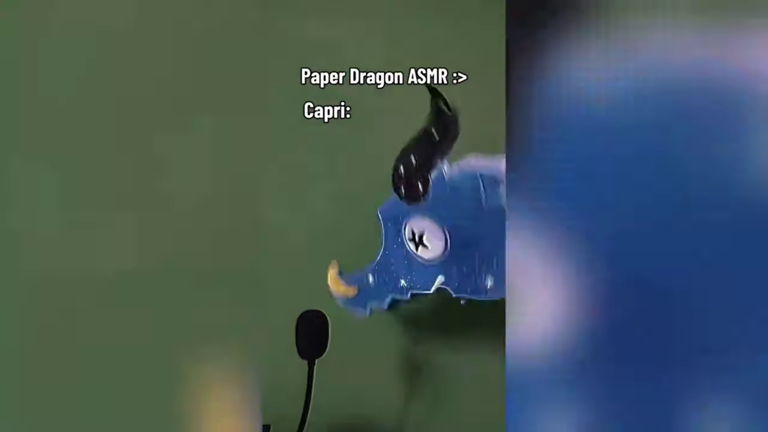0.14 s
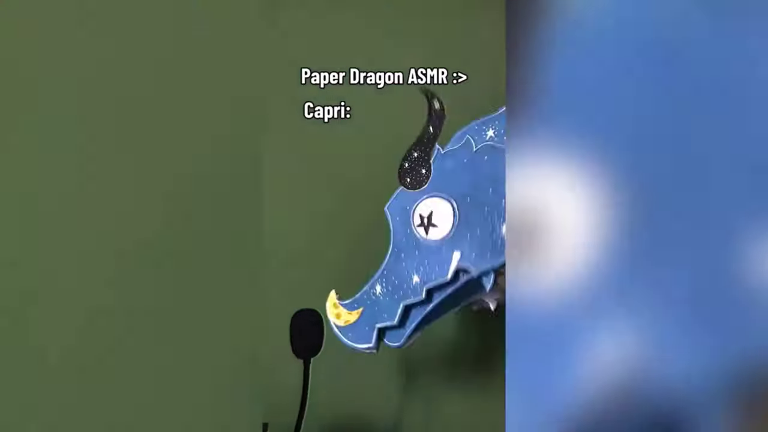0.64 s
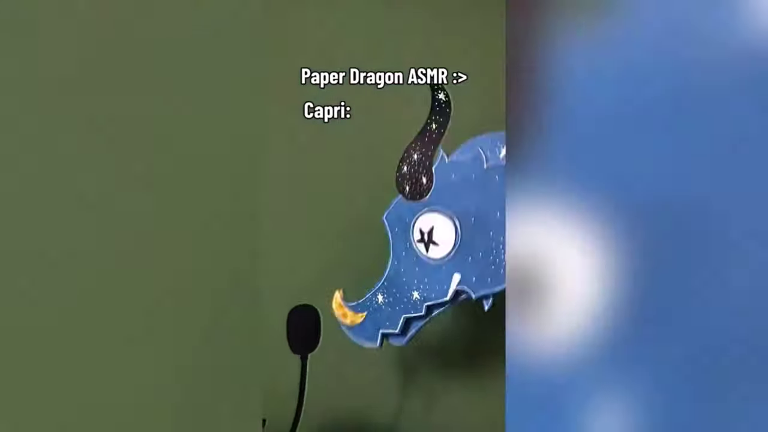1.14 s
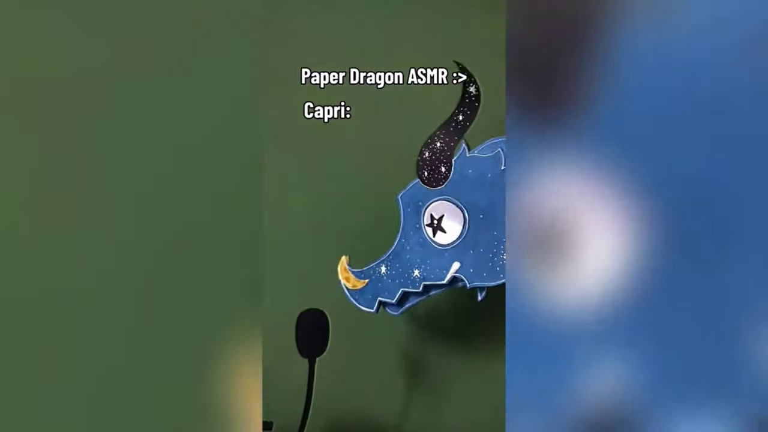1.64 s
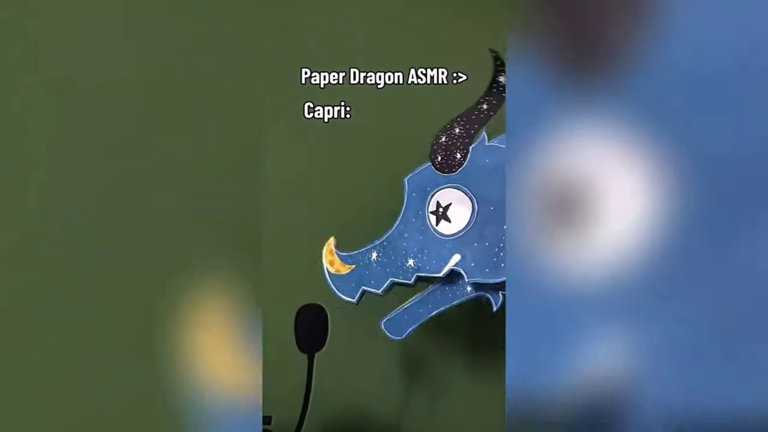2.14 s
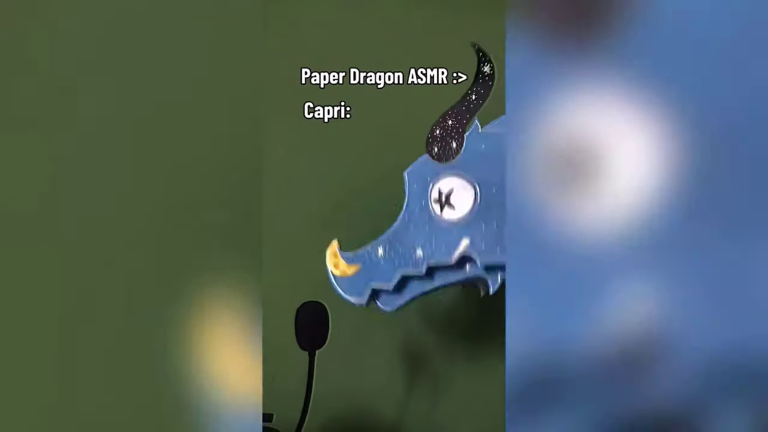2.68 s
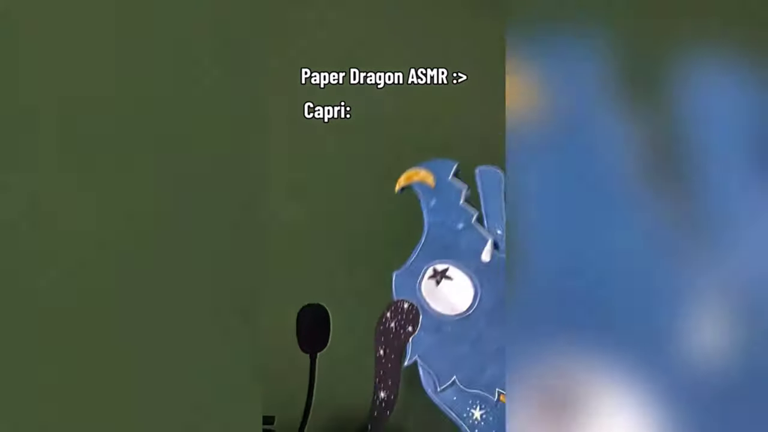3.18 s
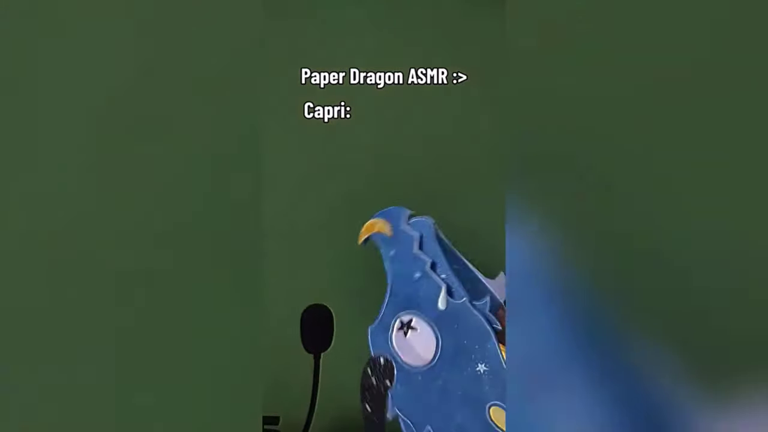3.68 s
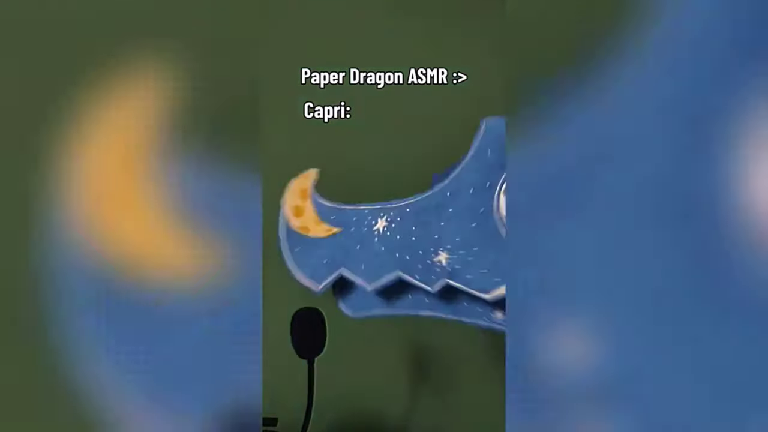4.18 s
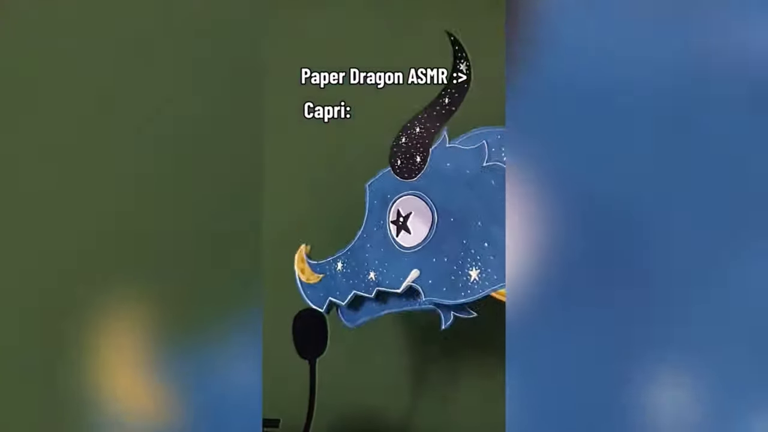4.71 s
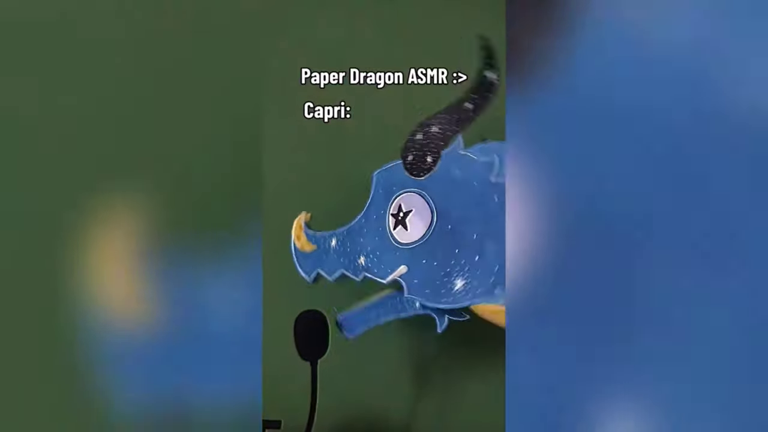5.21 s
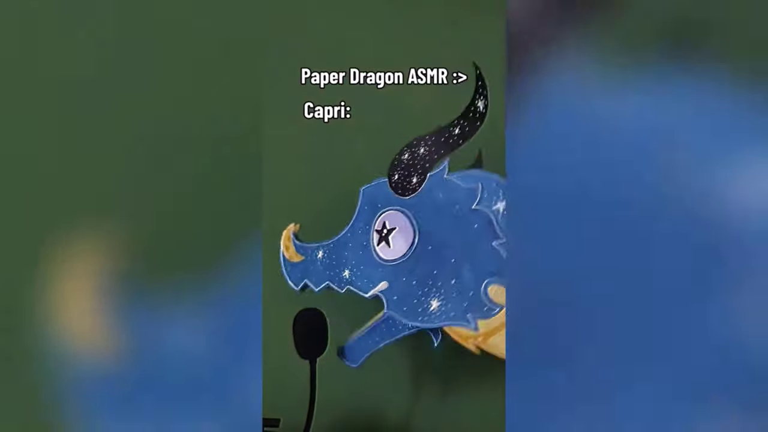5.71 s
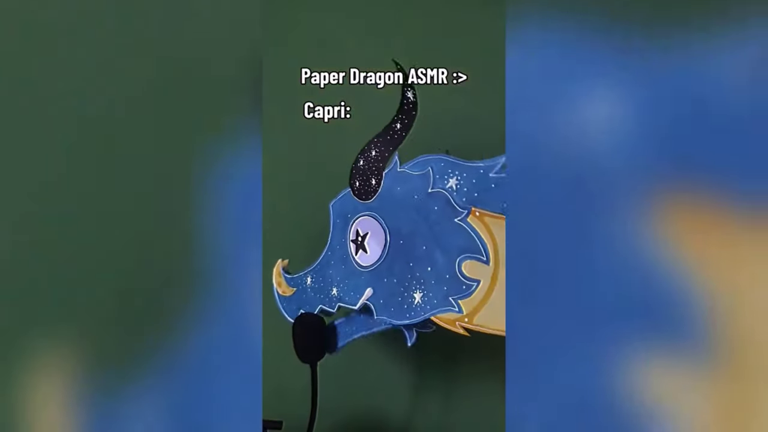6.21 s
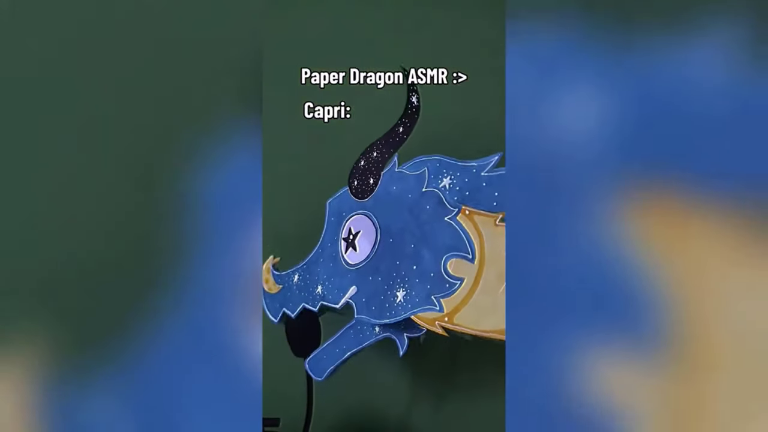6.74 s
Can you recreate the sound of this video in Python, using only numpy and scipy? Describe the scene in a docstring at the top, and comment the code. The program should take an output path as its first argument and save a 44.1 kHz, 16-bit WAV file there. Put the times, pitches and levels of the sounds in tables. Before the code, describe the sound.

Very close to a foam-covered microphone in a small quiet room, a stiff folded paper puppet is flapped and rubbed. An early papery clack with a low bump, soft rustles, then scattered dry snaps. A tight flurry of loud clacks and foam scrapes comes at four seconds, then separate ticks and puffs, and finally a loud crackling burst of snaps and scraping.

```python
"""In a small quiet room, a folded paper puppet is flapped, snapped and rubbed close to a foam-covered microphone.
Folds snap as noise cracks with ringing panels and puffs of air; creases tick and crackle as coloured clicks.
Paper scrapes the foam as clumped slips that ring the housing; knocks and touches set the thin stalk ringing and
swaying, or damp it. Waved paper pushes lumpy low noise at the microphone; sparse decaying taps answer for the
room, over a faint hush."""
import sys
import numpy as np
from scipy import signal
from scipy.fft import rfft, irfft
from scipy.io import wavfile
from scipy.ndimage import uniform_filter1d

SR = 44100
rng = np.random.default_rng(int(sys.argv[2]) if len(sys.argv) > 2 else 0)


def dump(signal):
    """Clip the signal to [-1, 1] and save it as 16-bit WAV at the path in sys.argv[1]."""
    limited = np.clip(np.atleast_2d(signal).T, -1, 1)
    pcm = np.round(limited * 32767).astype(np.int16)
    wavfile.write(sys.argv[1], SR, pcm)


def nominal_scale(level):
    """Amplitude ratio for a level in decibels (scalar or array-like)."""
    x = np.asarray(level, float) / 20
    return 10 ** x


N = 302526

# folds that snap: (time [s], ring peak [dB], ring of the fold [Hz], puff of air [dB])
SNAPS = [(0.354, -11, 886, -12.5), (1.042, -27.5, 576, -30.5), (1.624, -32, 1470, -82),
         (1.945, -21.5, 1540, -106), (2.103, -40, 735, -36), (2.135, -14, 623, -23.5),
         (2.208, -32.5, 750, -47.5), (2.357, -17.5, 726, -24.5), (2.555, -14.5, 795, -22),
         (2.782, -37.5, 614, -74), (2.982, -34, 1080, -73), (3, -29, 1470, -75), (3.229, -28.5, 1290, -45),
         (3.416, -25.5, 1370, -36), (3.606, -30, 1340, -38.5), (3.784, -26.5, 1140, -37.5),
         (3.966, -15.5, 737, -15.5), (4.017, -14.5, 1190, -17), (4.037, -6, 685, -17),
         (4.074, -10.5, 840, -17.5), (4.299, -16.5, 890, -30), (4.573, -22.5, 700, -34),
         (4.771, -44, 810, -22), (4.991, -23.5, 700, -32), (5.004, -54, 520, -8.5), (5.219, -21, 675, -35),
         (5.234, -32, 730, -9.5), (5.423, -12.5, 645, -9.5), (5.678, -29.5, 490, -14),
         (5.947, -27, 900, -64), (6.473, -6.5, 1450, -46), (6.483, -8.5, 1510, -28),
         (6.488, -8.5, 1330, -10), (6.497, -17, 1370, -34), (6.553, 0, 820, -35)]
# paper in touch with the foam: (start [s], end [s], first relative level [dB], last relative level [dB])
SCRAPES = [(0.023, 0.054, -47.5, -62), (0.367, 0.383, -26, -44), (3.97, 3.983, -30, -59),
           (3.981, 4.013, -56, -36), (4.048, 4.066, -53, -27.5), (4.772, 4.792, -36, -52.5),
           (4.849, 4.886, -62, -38.5), (5.951, 5.966, -42.5, -53.5), (5.973, 6.103, -62, -64.5),
           (6.233, 6.273, -57.5, -62), (6.392, 6.497, -58, -38.5), (6.434, 6.503, -44.5, -36.5),
           (6.502, 6.516, -34, -69), (6.549, 6.577, -38, -31), (6.578, 6.682, -44, -46.5),
           (6.701, 6.809, -40, -60)]
# knocks and damping touches on the stalk: (time [s], ring level [dB], sway level [dB])
KNOCKS = [(0.025, -99.5, -25), (0.361, -12, -16.5), (0.522, -23, -15), (0.597, -25.5, -21),
          (0.825, -29, -14.5), (1.246, -42, -23), (3.972, -16.5, -12.5), (4.071, -19.5, -30.5),
          (4.785, -19.5, -23), (4.865, -43, -19.5), (5.001, -34, -21.5), (5.947, -28, -18),
          (6.264, -22.5, -16), (6.44, -42, -17.5), (6.695, -24.5, -38), (6.766, -43, -32)]
LANDING_S = 0.012  # a snap this close to the start of a scrape lands on the foam
GIVE_S = 0.017  # a panel that gives this shortly before the next snap or scrape does not crack freely


def evened(x):
    """Scales to rms 1."""
    return x / np.sqrt(np.mean(x ** 2) + 1e-20)


def wander(size):
    """Slow random drift of rms 1: noise averaged over size samples."""
    return evened(uniform_filter1d(rng.standard_normal(N), size=size))


def read(points, hz, axis=1):
    """One column of a table over log frequency."""
    table = np.transpose(points)
    return np.interp(np.log(hz + 1), np.log(table[0] + 1), table[axis])


def coloured(x, points):
    """Filters x by the (Hz, dB) curve of a table."""
    gain = nominal_scale(read(points, np.fft.rfftfreq(len(x), 1 / SR)))
    return irfft(rfft(x) * gain, len(x))


def resonate(x, hz, width):
    """A resonance of gain about 1 at hz, width in Hz."""
    r = np.exp(-np.pi * width / SR)
    return 2 * signal.lfilter([1 - r], [1, -r * np.exp(2j * np.pi * hz / SR)], x).real


def steep(x, hz, width):
    """A resonance applied twice: little leaks far from hz."""
    return resonate(resonate(x, hz, width), hz, width)


def add(mix, s, sound):
    """Mixes a sound in at s seconds."""
    part = mix[round(s * SR):][:len(sound)]
    part += sound[:len(part)]


def burst(t, t60):
    """One sharp break, half a millisecond in, within a short rattle of noise."""
    rattle = rng.standard_normal(len(t)) * np.minimum(t / 0.00063, 1) * nominal_scale(-60 * t / t60)
    rattle[round(SR / 2000)] -= 3.5
    return rattle


def ticks(count, per_s, spread_db):
    """Sparse clicks of random sign; a few are large."""
    size = nominal_scale(spread_db * np.minimum(rng.exponential(1, count), 4))
    return size * rng.choice([-1., 1.], count) * (rng.random(count) < per_s / SR)


def snaps():
    """A fold flips: a few ms of crack and a short ring of the panel; apart from them, a push of air heard close by."""
    # spectrum of the crack: (frequency [Hz], relative gain [dB])
    crack_spectrum = [(900, -29), (1600, 7), (4000, 4), (11000, -7), (16000, -10.5)]
    crack_db, soft_db = -3, -34  # crack before colouring, relative to ring and puff; gentler flips are muffled
    pressed_db, firm_db = 18, -48  # a scrape that starts firmer than firm_db takes pressed_db off a crack
    muffled_db = 47  # taken off a crack on the foam, just before another snap or from a gentle flip
    t = np.arange(1500) / SR
    cracks, rings, puffs = np.zeros(N), np.zeros(N), np.zeros(N)
    for s, db, hz, puff_db in SNAPS:
        landing = any(abs(s - start) < LANDING_S for start, *_ in SCRAPES)
        followed = any(0 < later - s < GIVE_S for later, *_ in SNAPS)
        pressed = any(start < s < end and first_db > firm_db for start, end, first_db, _ in SCRAPES)
        # the panel meets the foam flat and rings clearer
        strikes = any(0 <= start - s < GIVE_S for start, *_ in SCRAPES)
        force = np.hypot(nominal_scale(db), nominal_scale(puff_db))
        muffled = landing or followed or strikes or force < nominal_scale(soft_db)
        loss_db = pressed_db * pressed + muffled_db * muffled
        add(cracks, s, force * nominal_scale(crack_db - loss_db) * burst(t, 0.009))

        shake = burst(t, 0.007)
        ring = steep(shake, hz, (0.42 if strikes else 0.9) * hz)
        ring += (0.14 if strikes else 0.25) * steep(shake, 1.9 * hz, 1.5 * hz)
        add(rings, s, nominal_scale(db) * ring / abs(ring).max())

        u = t / 0.00047  # time in units of the push's rise
        flutter = steep(burst(t, 0.04), 400, 600)
        puff = -u * np.exp(1 - u) + 0.45 * flutter / abs(flutter).max()
        add(puffs, s, nominal_scale(puff_db) * puff)
    return rings + coloured(cracks, crack_spectrum), puffs


def creases():
    """Single creases tick close to the microphone: short bursts through a broad resonance."""
    # single ticks: (time [s], peak [dB], centre [Hz])
    crease_ticks = [(1.5769, -21, 3180), (1.677, -30, 2500), (3.8862, -29.5, 12100), (3.917, -28, 3970),
                    (4.1737, -16.5, 2440), (4.2625, -27.5, 6340), (4.4734, -34, 9600), (4.483, -33, 10000),
                    (4.496, -31, 8800), (4.9035, -20.5, 4060), (4.9727, -25.5, 7760), (5.0994, -21.5, 3370),
                    (5.1876, -26.5, 2760), (5.3037, -22, 3330), (5.3847, -23, 11500), (5.7947, -13.5, 3900),
                    (5.8454, -24, 3150), (6.396, -25.5, 2540), (6.4334, -7, 3780), (6.505, -18, 4940),
                    (6.5095, -16, 3000), (6.5517, -10.5, 2500), (6.7243, -14, 2850), (6.755, -16.5, 2800),
                    (6.7972, -28.5, 2960), (6.84, -24, 3040)]
    t, out = np.arange(1500) / SR, np.zeros(N)
    for s, db, hz in crease_ticks:
        tick = resonate(burst(t, 0.0083), hz, 0.27 * hz)
        tick = np.diff(tick, prepend=0)  # thins the low end
        add(out, s, nominal_scale(db) * tick / abs(tick).max())
    return out


def ring_on():
    """Panels, and at 302 Hz the microphone housing, ring on after a blow: a decaying band of noise."""
    # what rings on: (time [s], centre [Hz], width of each filter pass [Hz], level before decay [dB])
    after_blows = [(1.948, 1430, 70, -50.5), (3.004, 3530, 1610, -56), (4.087, 302, 30, -44)]
    t, out = np.arange(SR // 4) / SR, np.zeros(N)
    t60 = 0.41  # s
    for s, hz, width, db in after_blows:
        hum = evened(steep(rng.standard_normal(len(t)), hz, width))
        add(out, s, nominal_scale(db - 60 * t / t60) * hum)
    return out


def crackle():
    """Clumped ticks of small creases over a fine rustle, which swells as paper slides on paper."""
    # handling of the paper: (time [s], relative crackle level [dB])
    handling = [(0, -42), (.8, -47), (1.4, -39.5), (1.75, -56), (2.2, -47.5), (3.9, -48.5), (3.964, -36),
                (3.968, -23.5), (4.077, -31), (4.083, -85), (4.398, -44), (5.4, -39), (5.6, -46.5),
                (6.86, -35)]
    # soft swells of paper sliding on paper: (middle [s], relative level [dB])
    rustles = [(0.474, -33), (0.569, -37), (0.686, -44.5), (0.825, -32.5), (0.89, -26.5), (1.041, -29),
               (1.1, -29.5), (1.324, -30.5), (6.487, -37), (6.574, -24.5)]
    # spectrum of the crackle: (frequency [Hz], relative gain [dB])
    crackle_spectrum = [(200, 6), (1500, -2.5), (3600, -8.5), (6800, -11), (16000, -12)]
    # spectrum of paper sliding on paper: (frequency [Hz], relative gain [dB])
    slide_spectrum = [(300, -3), (1200, -9), (3800, -10), (5400, -6), (6600, -17), (16000, -25)]
    clumps = np.minimum(nominal_scale(8 * wander(500)), 6)
    spells = np.minimum(nominal_scale(10 * wander(5000)), 4)  # creases give way in spells
    t, small = np.arange(400) / SR, np.zeros(N)
    for hz in np.geomspace(3500, 14000, num=6):
        rattle = rng.standard_normal(len(t)) * t * nominal_scale(-60 * t / 0.009)
        crease = evened(steep(rattle, hz, hz))
        small += signal.oaconvolve(ticks(N, 9 * clumps * spells, 3.5), crease)[:N]
    small = evened(small)
    fine = rng.standard_normal(N) * clumps ** 0.3

    time = np.arange(N) / SR
    half_s = 0.011  # from the middle of a swell to 1/e
    swells = sum(nominal_scale(peak_db) * np.exp(-((time - s) / half_s) ** 2) for s, peak_db in rustles)
    handling_s, handling_db = np.transpose(handling)
    touch = nominal_scale(np.interp(time, handling_s, handling_db))
    handled = coloured(touch * (0.34 * small + 0.19 * fine), crackle_spectrum)
    return handled + coloured(swells * (fine + 0.6 * small), slide_spectrum)


def scrapes():
    """Paper dragged on foam: uneven, clumped slips that ring the housing."""
    # housing resonances heard in a scrape: (frequency [Hz], width of each pass [Hz], relative gain [dB])
    housing_modes = [(303, 89, 3.5), (857, 253, -5), (1520, 390, -14.5), (2800, 470, -8)]
    # broad part of a scrape: (frequency [Hz], relative gain [dB])
    foam_spectrum = [(30, 13), (300, -4), (1300, -3), (3200, -13.5), (16000, -45)]
    light_db, damping = -67, 0.069  # above this touch, each dB takes this many dB off the upper resonance
    touch = np.zeros(N)
    for start, end, first_db, last_db in SCRAPES:
        add(touch, start, nominal_scale(np.linspace(first_db, last_db, round((end - start) * SR))))
    slips = evened(ticks(N, 1300, 4.2)) + 1.3 * rng.standard_normal(N)
    slips *= uniform_filter1d(touch, size=60) * nominal_scale(2.5 * wander(250))
    bright = slips * np.maximum(touch / nominal_scale(light_db), 1) ** -damping
    housing = sum(nominal_scale(db) * steep(bright if hz > 2000 else slips, hz, width)
                  for hz, width, db in housing_modes)
    return nominal_scale(19.5) * housing + nominal_scale(18.0) * coloured(slips, foam_spectrum)


def stalk():
    """Each knock or touch jolts the stalk, starts a ring and slow sway at its levels and damps the earlier ones."""
    # ring, then sway: (frequency [Hz], t60 [s])
    stalk_modes = [(38.57, 0.96), (10.2, 0.99)]
    thud_hz, thud_t60, thud_db = 28.4, 0.19, 19.5  # the first jolt: Hz, s, dB above twice the ring's dB
    t, out = np.arange(SR) / SR, np.zeros(N)
    for (s, *levels), (next_s, *_) in zip(KNOCKS, KNOCKS[1:] + [(N / SR,)]):
        thud_level = nominal_scale(2 * levels[0] + thud_db - 60 * t / thud_t60)
        add(out, s - LANDING_S / 2, -thud_level * np.sin(2 * np.pi * thud_hz * t))
        damped_db = -300 * np.maximum(t - (next_s - s), 0)
        for db, (hz, t60) in zip(levels, stalk_modes):
            add(out, s, -nominal_scale(db - 60 * t / t60 + damped_db) * np.sin(2 * np.pi * hz * t))
    return out


def air():
    """Waved paper pushes lumpy air at the microphone after each knock or touch and in bumps, over a faint draught."""
    # soft dull bumps as the waved puppet turns: (time [s], relative level [dB])
    turns = [(.815, -39), (1.035, -39), (1.247, -42)]
    # spectrum of the moving air: (frequency [Hz], relative gain [dB])
    air_spectrum = [(10, 18), (25, 5.5), (100, -17.5), (400, -65), (2000, -110)]
    t = np.arange(N) / SR
    gusts = sum(nominal_scale(sway_db) * (t > s) * np.exp(-abs(t - s) / 0.097) for s, _, sway_db in KNOCKS)
    lumps = nominal_scale(1.84 * wander(1500))
    bumps = sum(nominal_scale(db) * np.maximum(t - s, 0) / 0.02 * np.exp(1 - abs(t - s) / 0.02) for s, db in turns)
    dull = bumps * lumps * evened(steep(rng.standard_normal(N), 82, 310))
    draught = nominal_scale(-43.5)
    push = nominal_scale(-3.5) * uniform_filter1d(gusts, size=400) + draught
    return dull + push * evened(lumps * coloured(rng.standard_normal(N), air_spectrum))


def reflect(x):
    """Sparse taps of random sign, each band dying at its own speed."""
    # decay of the room: (frequency [Hz], t60 [s], relative level [dB])
    decay = [(304, 0.044, -16), (1270, 0.45, 1.5), (1940, 0.32, -6), (6000, 0.29, -3)]
    taps = np.zeros(SR // 2)
    at = np.arange(300, len(taps) - 20, 20)
    taps[at + rng.integers(0, 20, len(at))] = rng.choice([-1., 1.], len(at))
    hz, t, z = signal.stft(taps, SR, nperseg=256)
    fall_db = read(decay, hz, axis=2)[:, None] - 60 * t / read(decay, hz)[:, None]
    tail = signal.istft(z * nominal_scale(fall_db), SR, nperseg=256)[1]
    return signal.oaconvolve(x, tail / np.linalg.norm(tail))[:N]


def room(x):
    """The room's answer drifts steadily among three different random tails."""
    drift = 2 * np.pi * 4.1 * np.arange(N) / SR
    return sum(reflect(x * np.cos(drift + k * np.pi / 3)) for k in range(3)) * np.sqrt(2 / 3)


def hush():
    """The quiet background: steady coloured noise."""
    # spectrum of the hush: (frequency [Hz], relative gain [dB])
    hush_spectrum = [(10, 36.5), (25, -8), (60, -14), (250, -20), (1300, -14), (5000, -19), (16000, -34)]
    return nominal_scale(-51) * evened(coloured(rng.standard_normal(N), hush_spectrum))


def scene():
    """Paper in the room, plus what reaches the microphone by touch or only from close by."""
    t = np.arange(N) / SR
    folds, puffs = snaps()
    paper = folds + crackle()
    close = puffs + creases() + ring_on()
    # a snap made against the foam is loud only at the microphone: the room hardly answers
    touching = sum((t > start - GIVE_S) & (t < end + LANDING_S) for start, end, *_ in SCRAPES) > 0
    # likewise a snap near enough to push much air
    near_db = sum(max(puff_db + 24, 0) * (abs(t - s) < 0.01) for s, _, _, puff_db in SNAPS)
    into_room = paper * np.where(touching, 0.02, 1) * nominal_scale(-0.6 * near_db)
    echoes = nominal_scale(-12.0) * room(into_room)
    return (paper + close + echoes + scrapes() + stalk() + air() + hush())[None]


def low_pass(x):
    """Removes everything above the highest recorded frequency."""
    return signal.sosfilt(signal.butter(12, 16840, fs=SR, output="sos"), x)


def record(dry):
    """The input stage rounds off the highest peaks; the top of the treble is cut."""
    rounded = 0.59 * np.tanh(dry / 0.77)
    treble_cut = signal.firwin(255, 15900, fs=SR)[None]
    return low_pass(signal.oaconvolve(rounded, treble_cut, "same"))


dry = scene()
out = record(dry)
dump(out)
```